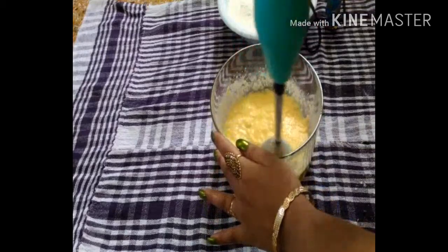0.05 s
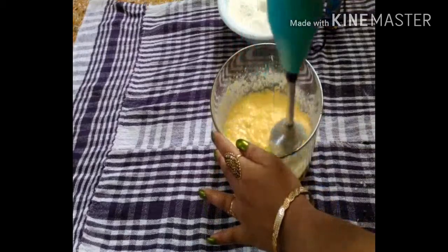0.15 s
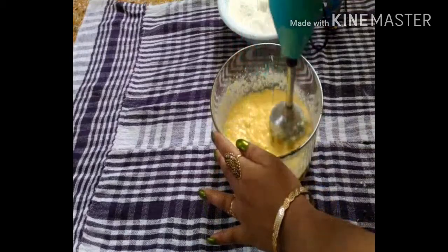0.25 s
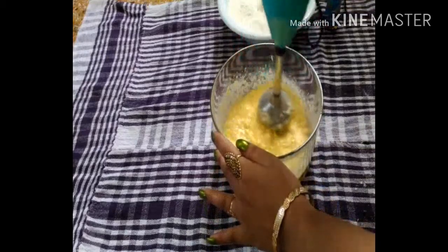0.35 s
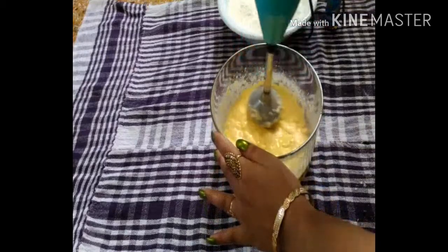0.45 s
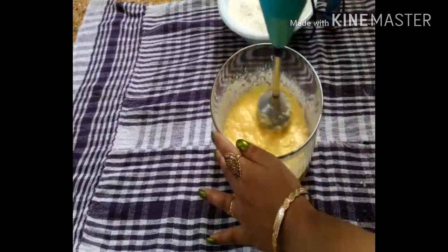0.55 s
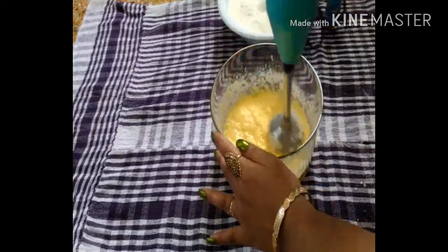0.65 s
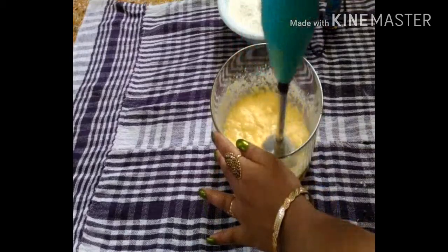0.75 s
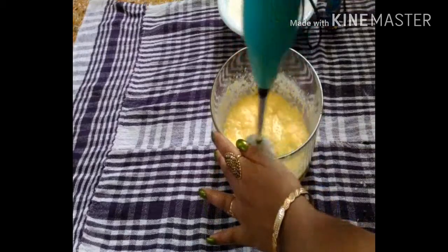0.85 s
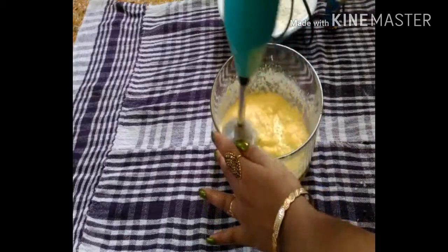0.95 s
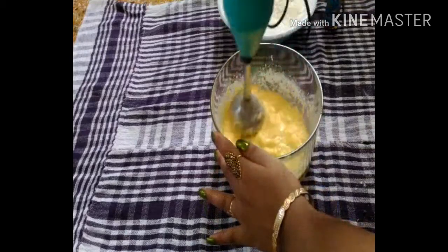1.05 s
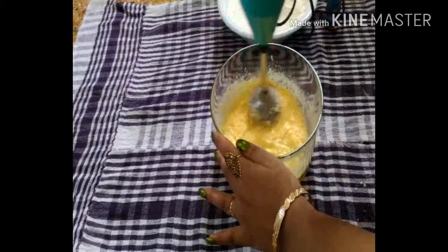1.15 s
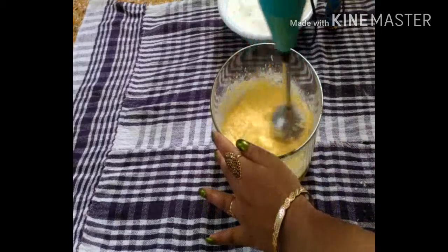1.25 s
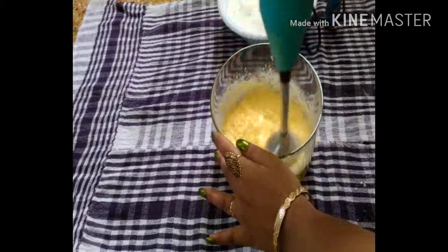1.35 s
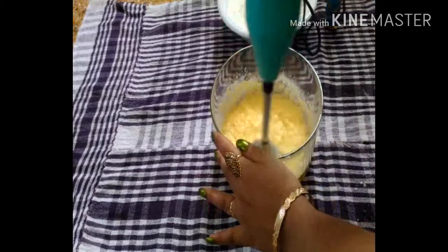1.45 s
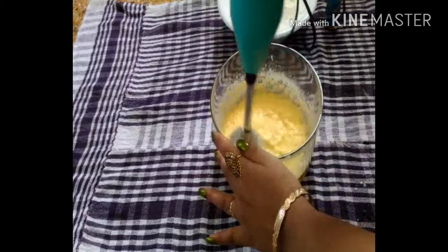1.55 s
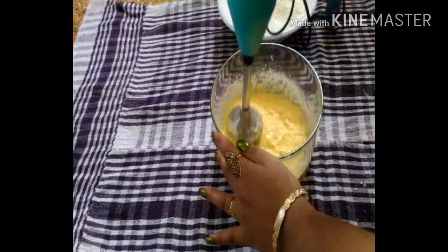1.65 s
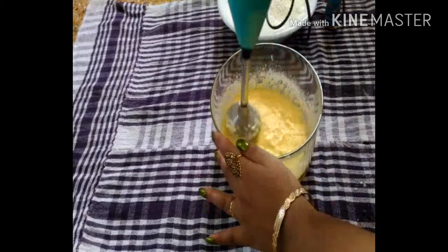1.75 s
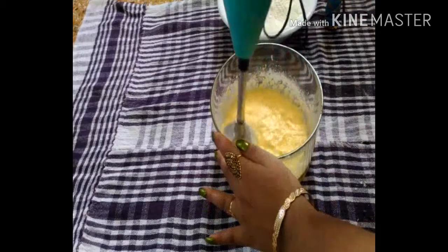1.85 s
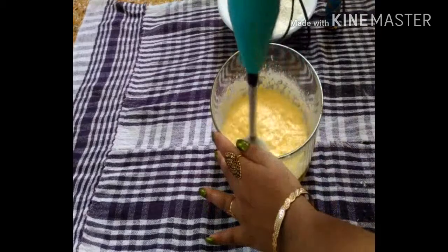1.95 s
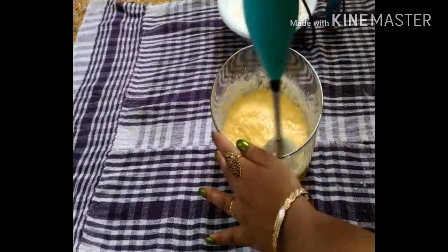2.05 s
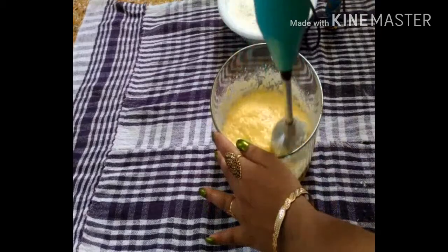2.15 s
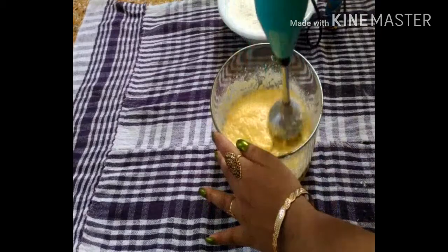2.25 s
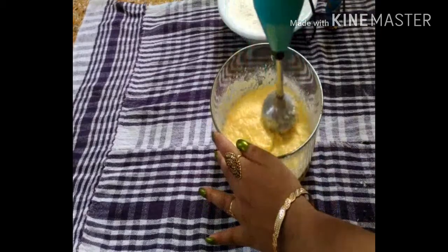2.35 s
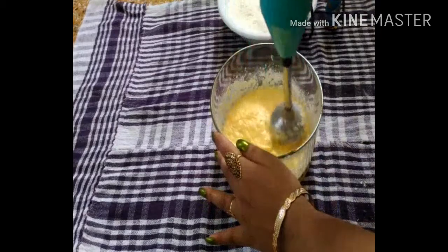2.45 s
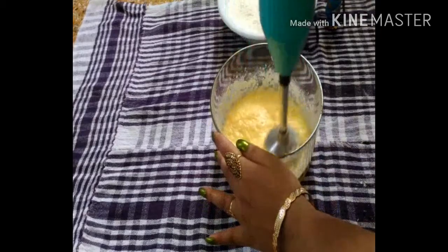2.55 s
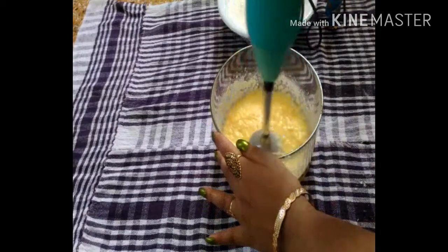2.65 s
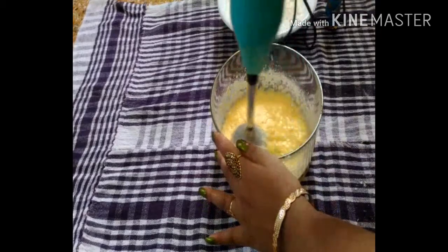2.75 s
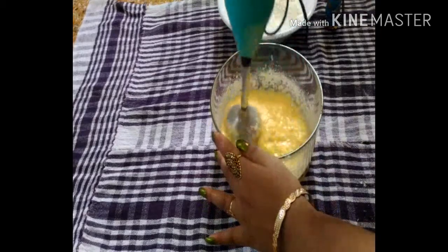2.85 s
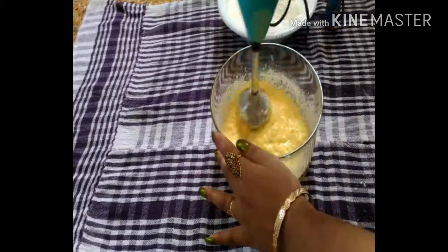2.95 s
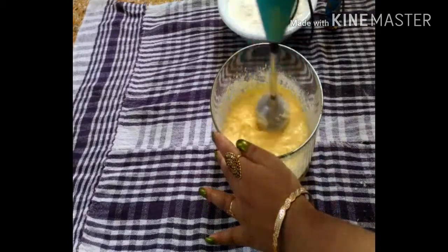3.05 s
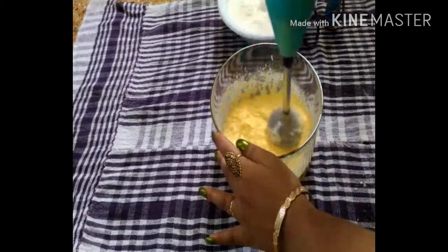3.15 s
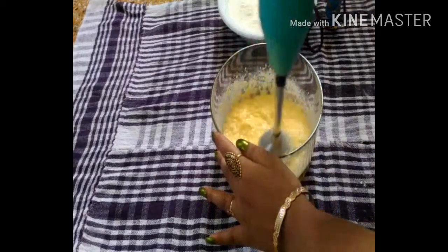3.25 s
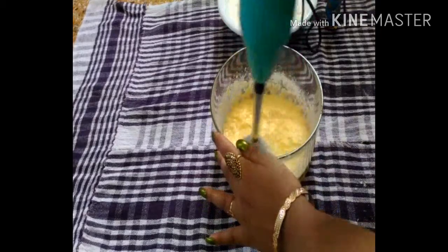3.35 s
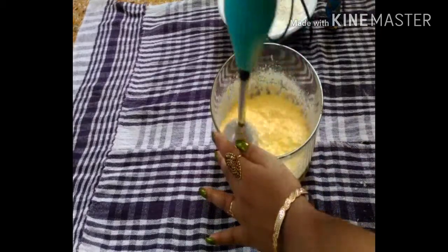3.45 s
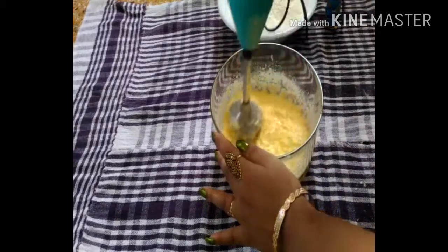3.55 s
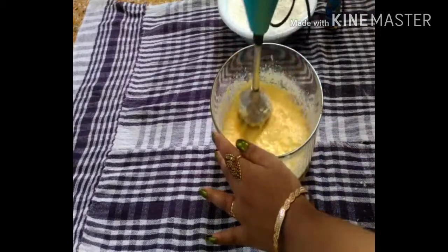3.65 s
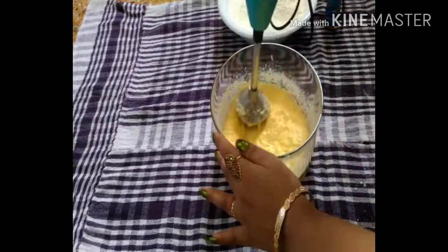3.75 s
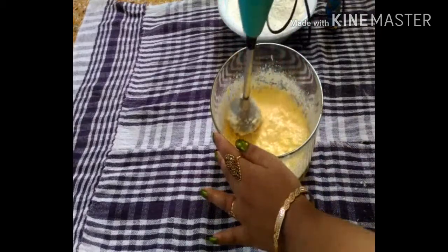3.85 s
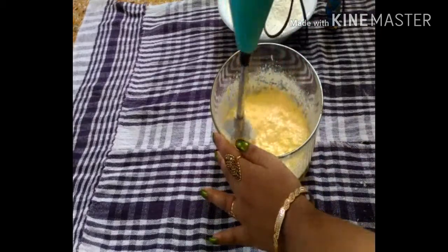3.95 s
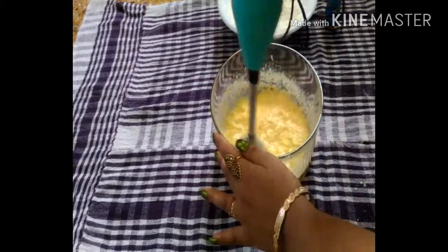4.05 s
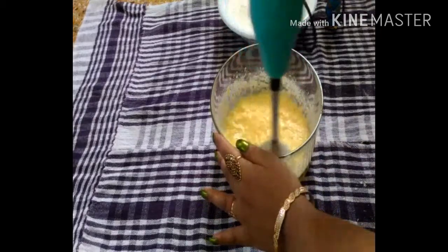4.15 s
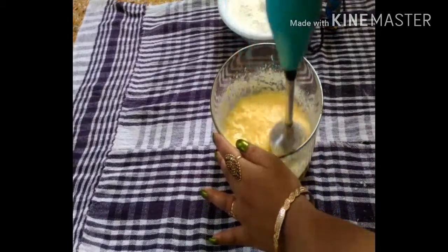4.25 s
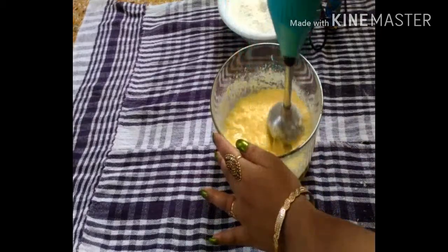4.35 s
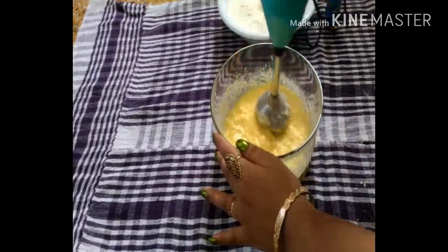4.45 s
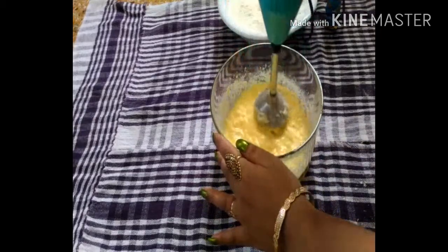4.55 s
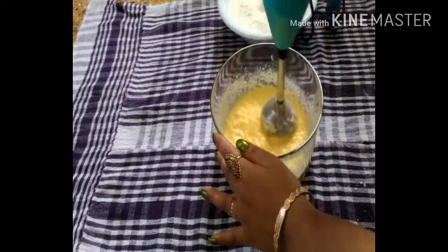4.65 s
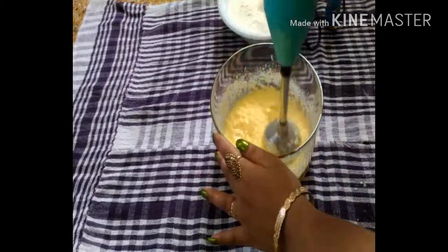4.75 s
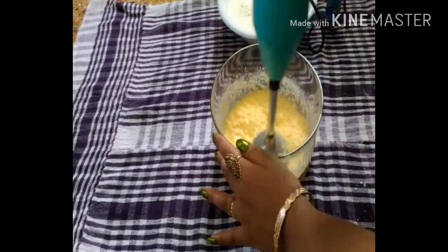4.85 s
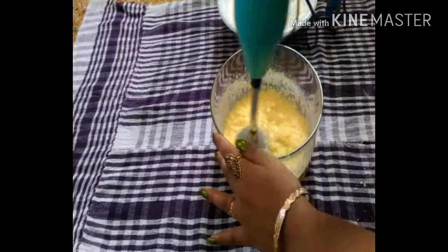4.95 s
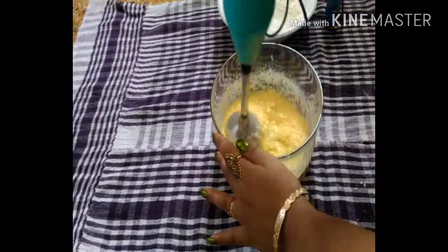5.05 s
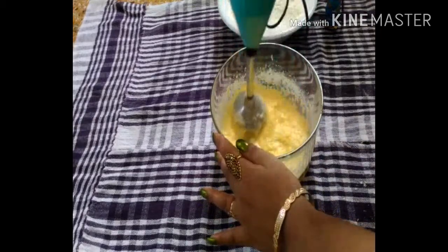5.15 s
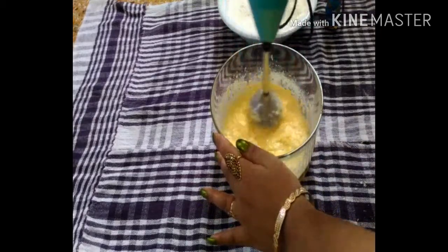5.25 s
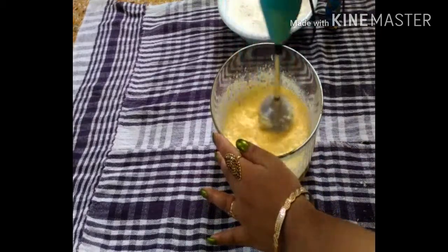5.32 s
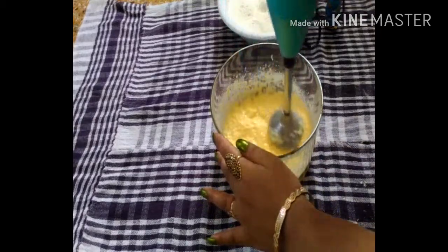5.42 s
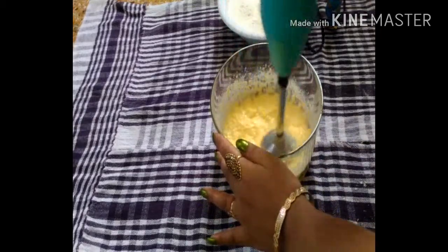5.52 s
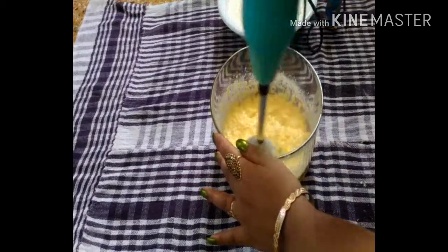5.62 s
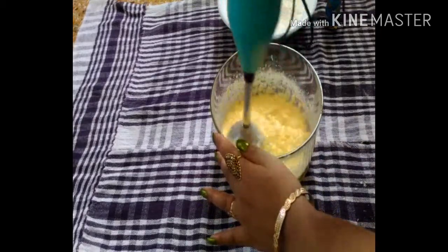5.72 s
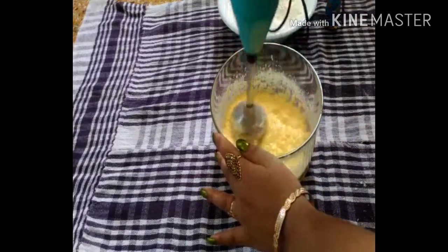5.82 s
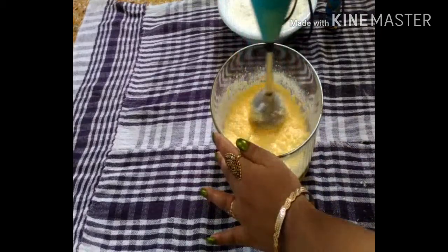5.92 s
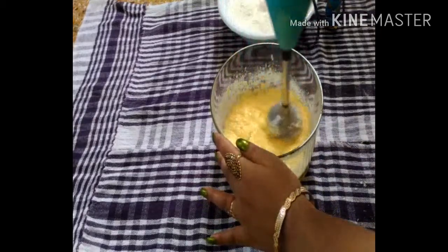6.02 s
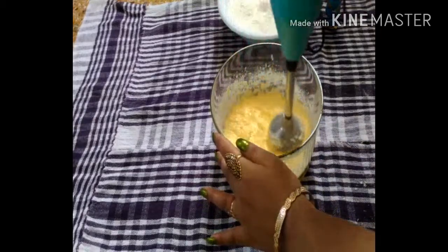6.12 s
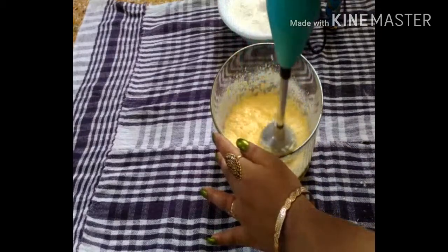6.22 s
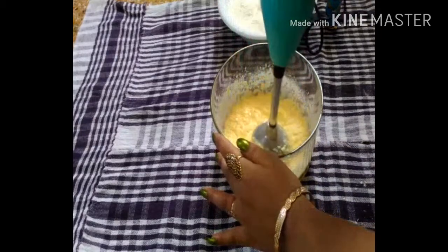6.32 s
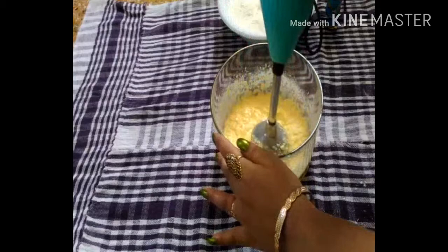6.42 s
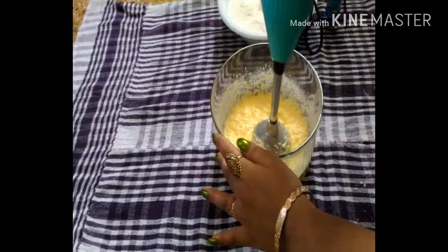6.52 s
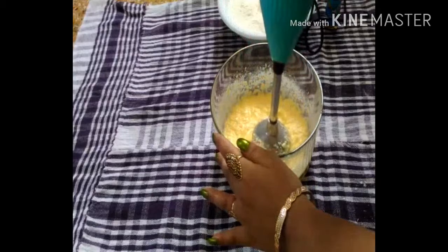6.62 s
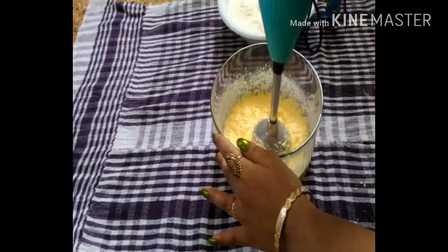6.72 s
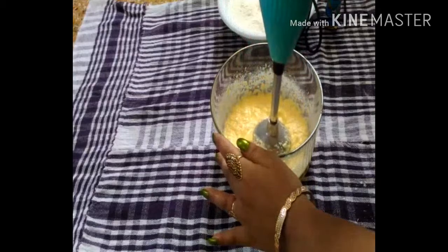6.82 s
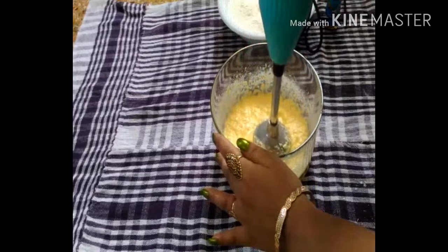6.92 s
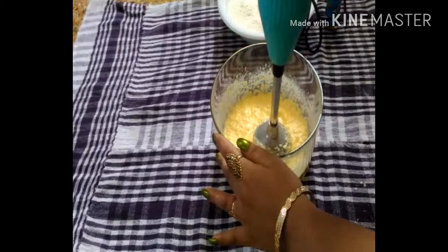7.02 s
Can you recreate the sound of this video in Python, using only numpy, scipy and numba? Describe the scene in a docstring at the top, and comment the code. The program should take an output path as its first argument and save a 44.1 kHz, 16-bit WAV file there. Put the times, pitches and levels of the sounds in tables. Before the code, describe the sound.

A phone held just over a glass picks up a blender already running in a thick egg mixture. Its whirr wavers with load, buried in sloshing, bubbling and sharp wet spatter, while the metal bell bumps and occasionally clinks on glass. The spatter is heaviest before the hand rests, then thins to a steady buzzing whine, ended by a plastic snap and quick coast-down in a close kitchen.

```python
"""A hand blender is stirred round a glass of eggs and butter in a kitchen, a phone held above it.
From the start the motor whines on multiples of its shaft speed, over the noise of fan and bearings; the blade
churns, gulps and sloshes the mix (filtered noise and bubble grains) and flings spray and blobs at the wall
(bright noise). The metal bell knocks and clinks on the glass (damped tones); other tones swell and pass.
At 6 s the hand stops stirring; at 6.83 s the switch clicks off and the blade coasts."""
import sys
import numpy as np
from scipy import signal
from scipy.io import wavfile
from scipy.ndimage import uniform_filter1d
from numba import njit

SR = 44100
rng = np.random.default_rng(int(sys.argv[2]) if len(sys.argv) > 2 else 0)


def file_out(sig):
    """Save sig as 16-bit WAV at sys.argv[1]."""
    # one column per channel
    cols = np.atleast_2d(sig).T
    # limit, then scale
    lim = np.clip(cols, -1, 1)
    pcm = np.round(lim * 32767).astype(np.int16)
    wavfile.write(sys.argv[1], SR, pcm)


N = 312222  # length [samples]


def undb(db):
    """Decibels to gain."""
    return 10 ** (np.asarray(db) / 20)


def unit(x):
    """Scaled to rms 1."""
    return x / np.sqrt(np.mean(x ** 2))


def peak(x, db):
    """Scaled to a peak level."""
    return x * undb(db) / np.max(np.abs(x))


def curves(table):
    """Columns of a table after the time, interpolated to one value a sample."""
    s, *columns = np.transpose(table)
    return [np.interp(np.arange(N) / SR, s, c) for c in columns]


def add(out, s, sound):
    """Mix a short sound in at s seconds."""
    i = int(s * SR)
    out[i:i + len(sound)] += sound[:N - i]


def walk(rate):
    """Random levels held 1 / rate s and slewed twice; spread near 1."""
    k = int(SR / rate)
    steps = np.repeat(rng.standard_normal(N // k + 1), k)
    return 1.1 * uniform_filter1d(uniform_filter1d(steps, k), k)[:N]


@njit
def svf(x, hz, width):
    """State-variable band-pass with a moving centre, gain 1 there."""
    y, b, l = np.empty(len(x)), 0., 0.
    for i in range(len(x)):
        g, k = np.tan(np.pi * hz[i] / SR), width / hz[i]
        v = (b + g * (x[i] - l)) / (1 + g * (g + k))
        b, l, y[i] = 2 * v - b, l + 2 * g * v, k * v
    return y


def band(x, hz, width):
    """Steep resonance: the band-pass twice."""
    hz = np.clip(hz, 20, .45 * SR) + np.zeros(len(x))
    return svf(svf(x, hz, 1. * width), hz, 1. * width)


def drops(per_s, scatter_db, ms):
    """A level that swells and falls at each droplet; sizes are scattered with a capped tail."""
    hit = rng.random(N) < per_s / SR
    size = undb(scatter_db * np.minimum(rng.exponential(size=N), 4))
    pole = [1, -np.exp(-1000 / (ms * SR))]
    # smoothed backwards for the swell, then forwards for the fall
    swell = signal.lfilter([1], pole, (hit * size)[::-1])[::-1]
    return unit(signal.lfilter([1], pole, swell))


@njit
def grains(at, hz, cycles, size, glide, count):
    """Each grain is a tone that swells, dies within a few cycles and can slide in pitch, like a bubble."""
    out = np.zeros(count)
    for k in range(len(at)):
        span, phase = cycles[k] * SR / hz[k], 0.
        for i in range(min(int(3 * span), count - at[k])):
            u = i / span
            phase += 2 * np.pi * hz[k] * (1 + glide * u) / SR
            out[at[k] + i] += size[k] * u * np.exp(-3 * u) * np.sin(phase)
    return out


def bubbles(per_s, hz, spread, cycles, scatter_db, glide):
    """Grains at random moments, pitches within spread octaves of hz, sizes with a capped long tail."""
    draw = rng.random((int(N / SR * 2000), 4))
    draw = draw[draw[:, 3] < per_s / 2000]  # thinned from 2000 a second
    at = (draw[:, 0] * N).astype(np.int64)
    pitch = (hz + np.zeros(N))[at] * 2 ** (spread * (2 * draw[:, 1] - 1))
    size = undb(scatter_db * np.minimum(-np.log(1 - draw[:, 2]), 3.5))
    cycles_each = cycles * (.5 + draw[:, 2])  # larger grains last more cycles
    return unit(grains(at, np.minimum(pitch, .4 * SR), cycles_each, size, 1. * glide, N))


KITCHEN_T60_S, KITCHEN_DB = .13, -22  # decay of the room's tail, its start against the direct sound


def kitchen_tail(ms):
    """Envelope of the faint tail from the kitchen walls."""
    return undb(KITCHEN_DB) * 1000 ** (-ms / 1000 / KITCHEN_T60_S)


def burst(rise_ms, fall_ms):
    """A puff of noise: quick rise, slower fall and the tail from the walls."""
    ms = np.arange(4096) / SR * 1000
    shape = np.exp(-ms / fall_ms) + kitchen_tail(ms)
    return (1 - np.exp(-ms / rise_ms)) ** 2 * shape * rng.standard_normal(len(ms))


def ring(hz, t60):
    """A damped tone with a soft start, its pitch sagging a little."""
    t = np.arange(4096) / SR
    return (1 - np.exp(-t / 0.00067)) * 1000 ** (-t / t60) * np.sin(2 * np.pi * hz * t * (1 - 1.05 * t))


OFF_S, COAST_S = 6.83, .5  # switch released; time in which the speed falls to 37%


def speed_share():
    """1 while powered, then the rotor coasts down."""
    return np.exp(-np.maximum(np.arange(N) / SR - OFF_S, 0) / COAST_S)


STILL_S, STILL_WAVER = 6.0, .3  # the hand stops stirring; share of the wavering that remains


def stirring():
    """1 while the hand stirs, less once it holds the blender still."""
    return np.interp(np.arange(N) / SR, [STILL_S - .1, STILL_S + .1], [1, STILL_WAVER])


def load():
    """How hard the blade works the mix: churn level about its mean, plus the surges, in dB."""
    db = curves(CHURN)[0]
    return db - np.mean(db) + surges()[1]


# shaft speed under power, slower where the mix is thick: (time [s], speed [Hz])
SHAFT = [(0.0, 185.4), (0.7, 186.5), (1.4, 183.2), (1.75, 187.2), (2.4, 188.6), (3.05, 186.5), (3.5, 189.8),
         (4.0, 189.9), (4.5, 191.7), (5.4, 184.6), (5.8, 188.0), (6.3, 188.8), (6.82, 186.5)]
# whine lines, 16 is the commutator: (multiple of shaft speed, relative level [dB])
ORDERS = [(2, -21), (3, -11), (4, -4), (5, -7), (6, -6), (7, -7), (8, -3), (9, -8), (12, -14), (16, -4)]
WHINE_DB = -45  # gain on the lines at mean load
WHINE_SPEED_POWER = 9.  # the whine dies quickly as the unpowered rotor slows
RIPPLE_HZ, RIPPLE = 103.1, 0.99  # the mains supply throbs the brushes twice a cycle; depth
BURIED_DB = -26  # muffling of the lines for each unit of stirring above the still hand
SHAFT_WAVER = .010  # share by which stirring makes the shaft speed waver


def motor(load_db):
    """Shaft orders waver separately, clear when the hand rests, and ring the pocket under the bell."""
    share, stir = speed_share(), stirring()
    shaft_hz = curves(SHAFT)[0] * share * (1 + SHAFT_WAVER * stir * walk(30))
    turn = 2 * np.pi * np.cumsum(shaft_hz) / SR
    powered = share == 1
    throb = 1 + RIPPLE * powered * np.cos(2 * np.pi * RIPPLE_HZ * np.arange(N) / SR)
    muffle = undb(BURIED_DB * (stir - STILL_WAVER))
    out = 0
    for order, db in ORDERS:
        level = undb(db + 4 * stir * walk(20)) * muffle
        line = level * np.sin(order * turn + 2 * stir * walk(40) + 2 * np.pi * rng.random())
        out = out + line * (throb if order > 6 else 1)
    pocket_hz = curves(CHURN)[1]
    out = out + undb(6 * stir) * band(out, pocket_hz, 300)
    return out * undb(WHINE_DB + 0.3 * load_db + 3.1 * stir * walk(5.7)) * share ** WHINE_SPEED_POWER


# the mix under the blade: (time [s], churn level [dB], air pocket under the bell [Hz],
# glass cavity against churn [dB], sizzle against churn [dB]); surges and flicker come on top
CHURN = [(0.0, -35.5, 1500, -3, -2.5), (0.35, -40.5, 1410, -8.5, -1), (0.6, -43, 1740, -2.5, -2.5),
         (0.9, -38.5, 1690, -0.5, -4), (1.35, -50.5, 1410, 4, 2), (1.6, -43, 1220, -10, 1.5),
         (1.85, -37, 1770, -2, -4.5), (2.15, -41.5, 1690, -12, 1.5), (2.45, -39.5, 1650, -7, -1),
         (2.75, -36, 1410, 0, -3), (3.05, -44, 1470, -6, -2), (3.35, -45.5, 1306, 2, -2),
         (3.6, -39, 1810, -8.5, 2.5), (3.98, -44, 1870, -5.5, -2.5), (4.15, -45.5, 1670, -4.5, 0.5),
         (4.3, -38.5, 1620, -5, -8), (4.48, -44.5, 1450, -12, -0.5), (4.6, -44, 1478, -7, 0.5),
         (4.75, -41, 1380, -4.5, 1.5), (5.07, -32.5, 1390, -4.5, -5.5), (5.3, -36.5, 1310, -6.5, -2),
         (5.53, -57.5, 1370, 0.5, -1), (5.8, -34.5, 1290, 1.5, -2), (6.05, -41.5, 1494, -12, -2.5),
         (6.85, -45.5, 1510, -6.5, 0.5), (7.08, -52.5, 1380, -4, -3.5)]
TICKS_PER_S, TICKS_DB = 120., -12  # small lumps ticking on the glass; dB against churn


def churn():
    """Bubbles and lumpy flow ring the pocket under the bell and the air in the glass."""
    db, pocket_hz, cavity_db, sizzle_db = curves(CHURN)
    db = db + surges()[1]
    pocket_hz = pocket_hz * (1 + .05 * stirring() * walk(12))
    lumps = drops(per_s=200., scatter_db=3., ms=2.5) * rng.standard_normal(N)
    pocket = unit(band(lumps, pocket_hz, 400))
    pocket = pocket + undb(3.5) * bubbles(250., 1380.0, 0.53, 33.0, scatter_db=2.0, glide=0.024)
    cavity = unit(band(lumps, 835, 147))
    cavity = cavity + undb(1.0) * bubbles(70., 860., 0.1297, 25.0, scatter_db=3.5, glide=0.028)
    sizzle = unit(band(lumps, 2550, 5800))
    sizzle = sizzle + undb(-4.5) * bubbles(400., 2840, 0.349, 39.0, scatter_db=2.0, glide=0)
    sizzle = sizzle + undb(-14) * unit(band(lumps, 2990, 114))
    ticks = drops(per_s=TICKS_PER_S, scatter_db=2.5, ms=.6) * rng.standard_normal(N)
    ticks = undb(db + TICKS_DB) * unit(svf(ticks, np.full(N, 3200.), 6700.0))
    pocket = undb(db + 1.6 * walk(17)) * unit(pocket)
    cavity = undb(db + cavity_db + 2.0 * walk(12.0)) * unit(cavity)
    sizzle = undb(db + sizzle_db + 1.6 * walk(9)) * unit(sizzle)
    return ticks + pocket + cavity + sizzle


# the blade breaks the surface and throws a sheet of mix:
# (middle [s], half length [s], spray lift [dB], churn lift [dB])
SURGES = [(0.428, 0.032, 12, 3.5), (0.802, 0.061, 2, 2.5), (0.987, 0.087, 10.5, 0), (1.404, 0.17, 3, 3.5),
          (2.02, 0.28, 4, 0), (2.26, 0.11, 6.5, 4), (2.6, 0.19, 6, -2), (2.853, 0.073, 9.5, 8),
          (2.925, 0.017, 9, 1), (2.98, 0.039, 7, -0.5), (3.373, 0.11, 7, 3.5), (3.548, 0.086, 1, -4),
          (4.047, 0.22, 4.5, 8.5), (4.236, 0.068, 6, 8), (4.334, 0.065, 9, 5.5), (4.524, 0.18, 7.5, 7),
          (4.664, 0.047, -3, 7), (4.9, 0.2, 4.5, -1), (5.117, 0.13, 13.5, 1), (5.266, 0.13, 8.5, -1.5),
          (5.447, 0.25, -2, 4.5), (5.607, 0.35, 1, 10.5), (5.798, 0.16, 3.5, -3), (5.98, 0.11, 3, -1.5),
          (6.756, 0.026, 10.5, 3)]


def surges():
    """Lift of spray and of churn in dB: each surge swells and sinks smoothly."""
    t, lift = np.arange(N) / SR, np.zeros((2, N))
    for s, half_s, *db in SURGES:
        i = slice(int((s - half_s) * SR), int((s + half_s) * SR))
        lift[:, i] += np.outer(db, np.cos(np.pi / 2 * (t[i] - s) / half_s) ** 2)
    return lift


# steady spray before surges and gusts: (time [s], bright level [dB], lower hiss level [dB])
SPRAY = [(0.0, -26.5, -39), (0.43, -34.5, -45.5), (0.91, -32, -45.5), (1.12, -33.5, -48),
         (1.52, -37.5, -47), (2.54, -34.5, -44), (2.78, -28.5, -42), (3.1, -36, -49), (3.57, -37.5, -46),
         (3.92, -36.5, -50.5), (4.22, -32, -41.5), (4.53, -34, -48.5), (4.87, -32.5, -40.5),
         (5.09, -34, -42.5), (5.4, -32, -43.5), (5.84, -30, -42.5), (6.07, -35, -47), (6.76, -41.5, -49),
         (6.94, -51, -56), (7.08, -53, -56)]
# bright bands of the spray: (centre [Hz], width [Hz], relative level [dB])
SPRAY_MODES = [(9200, 600, 3), (10500, 2200, 3.5), (13200, 3000, -9.5), (7150, 2040, -9.5)]
SPRAY_DRIFT = .025  # share by which the bands wander


def spray():
    """Dense droplets in gusts, bright where the microphone port resonates; mid and side."""
    (db, lower_db), (spray_lift_db, churn_lift_db) = curves(SPRAY), surges()
    gust_db, swell_db = 0.23 * walk(45), 1.4 * walk(19)
    gusts = undb(db + spray_lift_db + gust_db + swell_db)
    lower_db = lower_db + 0.6 * spray_lift_db + 0.27 * churn_lift_db
    lower_db = lower_db + gust_db + .8 * swell_db + 2.5 * walk(25)
    # mid and side share the droplets' timing, with unrelated noise in each
    gates = [0.9 + drops(per_s=450., scatter_db=1.5, ms=1.) for _ in SPRAY_MODES]
    lower_gate = drops(per_s=400., scatter_db=4.5, ms=4.)
    out = []
    for lower_cut_db in (0, -46):  # hardly any lower hiss in the side
        noise = rng.standard_normal(N)
        bright = 0
        for gate, (hz, width, mode_db) in zip(gates, SPRAY_MODES):
            mode = band(gate * noise, hz * (1 + SPRAY_DRIFT * walk(9)), width)
            bright = bright + undb(mode_db + 4.5 * walk(30)) * mode
        pings = undb(-4.5) * bubbles(550.0, 9740, 0.21, 8.4, scatter_db=1., glide=0)
        lower = unit(band(lower_gate * rng.standard_normal(N), 4900 * (1 + SPRAY_DRIFT * walk(9)), 1080))
        out.append(gusts * unit(unit(bright) + pings) + undb(lower_db + lower_cut_db) * lower)
    return out


# blobs slapping the wall: (middle [s], bright peak [dB], centre [Hz], lower body against peak [dB])
SPLATS = [(0.0223, -20, 11000, -16), (0.0293, -17, 11300, -25), (0.0953, -17, 10600, -19),
          (0.1693, -16, 10200, -17), (0.24, -18, 10300, -23), (0.3385, -17, 9800, -21),
          (0.3493, -28, 10300, -18), (0.379, -18, 9700, -19), (0.3866, -17, 9500, -21),
          (0.41, -11, 10600, -29), (0.4208, -15, 10300, -29), (0.429, -13, 10300, -17),
          (0.4323, -9, 9500, -30), (0.6382, -19.5, 10100, -22), (0.7012, -18, 9700, -16),
          (0.725, -17, 10400, -13), (0.7448, -16, 10400, -23), (0.7488, -14, 10200, -22),
          (0.79, -18, 10100, -15), (0.8, -19, 10400, -13), (0.8403, -13.5, 9400, -11),
          (0.8715, -21, 9500, -14), (0.89, -16.5, 9600, -20), (0.929, -13, 9800, -20),
          (0.9503, -9, 10000, -27), (0.9774, -15, 10900, -25), (0.983, -10, 10200, -21),
          (0.9897, -6, 10300, -20), (1.0159, -15.5, 10500, -10.5), (1.057, -15.5, 9200, -20),
          (1.0933, -16, 8500, -20), (1.2244, -20, 10200, -26), (1.2602, -16, 9100, -27),
          (1.3203, -19, 10100, -11), (1.3528, -17.5, 10300, -26), (1.3578, -17, 10400, -17),
          (1.389, -14, 10100, -15), (1.4615, -11, 9900, -21), (1.4706, -25, 9900, -21),
          (1.4769, -18, 9900, -20), (1.6393, -20, 10800, -4), (1.6952, -19, 10300, -22),
          (1.7692, -17, 9900, -20), (1.851, -16, 10400, -10), (1.8602, -19, 10100, -20),
          (1.8706, -7, 10500, -30), (1.9, -10, 10200, -21), (1.978, -10, 10550, -26),
          (2.0003, -10, 10600, -20), (2.0068, -19, 10800, -12), (2.0397, -17, 10100, -19),
          (2.1141, -19, 10700, -22), (2.2335, -16, 10000, -19), (2.2488, -22, 9800, -20),
          (2.2597, -21, 10200, -20), (2.3371, -13, 9900, -27), (2.343, -19, 10500, -24),
          (2.3854, -17.5, 10800, -24), (2.424, -16, 10200, -17), (2.4896, -17, 10100, -19),
          (2.5272, -8.5, 10600, -22), (2.561, -17, 11300, -21), (2.5689, -15, 10100, -20),
          (2.5936, -19, 9500, -20), (2.6043, -12, 9600, -24), (2.6285, -23, 11400, -14),
          (2.644, -18, 9500, -19), (2.7489, -15, 10000, -14), (2.7794, -12, 10200, -23),
          (2.7951, -11, 11100, -28), (2.8244, -12, 9600, -22), (2.8296, -11, 10000, -15),
          (2.8406, -10, 10400, -24), (2.8493, -10, 9100, -13), (2.8591, -8, 10000, -27),
          (2.8673, -8, 11200, -21), (2.88, -8, 9300, -18), (2.8846, -10, 9800, -10.5),
          (2.891, -15, 9200, -18), (2.927, -12, 10200, -23), (2.9304, -11, 9300, -14),
          (2.9567, -12, 9200, -18), (2.9636, -17, 9200, -26), (2.969, -17, 10200, -25),
          (2.9831, -15, 9300, -24), (2.9887, -7.5, 10780, -25), (2.993, -16, 9250, -22),
          (2.999, -14, 9500, -21), (3.013, -20, 10500, -29), (3.1443, -16.5, 8800, -20),
          (3.152, -19, 11300, -13), (3.224, -19.5, 10400, -25), (3.3248, -22, 10000, -29),
          (3.3338, -22, 10000, -23), (3.3513, -14, 9600, -16), (3.4446, -13, 9300, -29),
          (3.4476, -16, 9300, -19), (3.5337, -16.5, 10400, -23), (3.5583, -16, 11200, -9),
          (3.563, -15.5, 9900, -17), (3.569, -17, 10300, -21), (3.6761, -21, 10300, -13),
          (3.6854, -14, 10200, -22), (3.9351, -16, 10600, -12), (4.0152, -18, 10100, -20),
          (4.0514, -18, 11000, -25), (4.0707, -8.5, 10200, -27), (4.1072, -11.5, 10000, -9.5),
          (4.1176, -17, 9700, -19), (4.1467, -18, 9900, -18), (4.2259, -21, 10200, -15),
          (4.2337, -13, 9800, -17), (4.239, -3.5, 9900, -27), (4.2472, -11, 10700, -24),
          (4.2658, -13, 10500, -21), (4.3168, -15, 9500, -20), (4.3413, -16, 9700, -17),
          (4.3559, -21, 10100, -20), (4.3861, -14, 9300, -23), (4.4043, -17, 9200, -23),
          (4.478, -10, 9500, -14), (4.4857, -13, 10100, -14), (4.4898, -6.5, 9600, -24),
          (4.513, -10, 9300, -28), (4.5196, -10.5, 9300, -12), (4.5448, -14, 10400, -12),
          (4.5803, -14, 9500, -15), (4.6517, -6, 9600, -28), (4.6867, -11, 9500, -21),
          (4.7263, -17, 9800, -17), (4.8255, -9, 9300, -12.5), (4.829, -12, 10000, -10),
          (4.8374, -18, 10100, -17), (4.8612, -10, 9900, -20), (4.891, -8.5, 9400, -17),
          (4.8984, -11, 9800, -22), (4.9408, -11, 9500, -16), (4.9553, -18, 9800, -15),
          (5.0473, -17, 10200, -12), (5.0546, -9.5, 9100, -21), (5.1, -19, 9700, -17),
          (5.109, -19, 10300, -23), (5.1163, -11, 10500, -3.5), (5.13, -9.5, 10300, -17),
          (5.1434, -10, 9600, -21), (5.15, -10, 9800, -13), (5.157, -11.5, 10100, -10),
          (5.1602, -8, 9500, -13), (5.1812, -7, 10100, -27), (5.186, -8, 10700, -21),
          (5.197, -11, 10500, -22), (5.2157, -5, 10900, -30), (5.2417, -12, 11200, -19),
          (5.252, -15, 11200, -26), (5.2566, -11.5, 11200, -16), (5.2607, -11, 9200, -18),
          (5.3131, -15.5, 9600, -17), (5.3235, -20, 9200, -20), (5.3564, -20, 10000, -19),
          (5.4123, -9.5, 9000, -14), (5.49, -16, 10200, -26), (5.504, -12.5, 10100, -25),
          (5.5385, -12.5, 9500, -20), (5.585, -17, 10000, -1), (5.616, -16, 9500, -17),
          (5.621, -12.5, 9300, -24), (5.6638, -16, 10100, -12), (5.6831, -14, 9600, -15),
          (5.6947, -18, 9600, -22), (5.7004, -10.5, 10000, -24), (5.7593, -13, 10800, -3),
          (5.763, -8.5, 10300, -8.5), (5.767, -6.5, 10000, -10), (5.774, -10, 10700, -15),
          (5.7913, -17, 11000, -20), (5.798, -7.5, 9040, -14), (5.8036, -10, 10300, -20),
          (5.8131, -11, 11000, -18), (5.8236, -18, 10500, -26), (5.8308, -15, 10800, -21),
          (5.8346, -11, 10500, -21), (5.8386, -18, 10900, -20), (5.8537, -11, 10500, -27),
          (5.8926, -12, 8700, -19), (5.945, -7, 10900, -31), (5.9498, -13, 10900, -10),
          (5.9537, -15, 10500, -12), (5.971, -18, 11200, -23), (5.9803, -16, 10480, -22),
          (5.99, -18, 10500, -23), (6.009, -22, 10000, -25), (6.0516, -20, 10500, -30),
          (6.1181, -14, 10400, -10), (6.4108, -16, 9700, -11), (6.4821, -22, 9400, -20),
          (6.5482, -24, 8800, -7), (6.554, -23, 10200, -21), (6.7491, -22, 10400, -13)]
SPLAT_MS, SPLAT_WIDTH_HZ = 1.15, 1900  # time in which a blob swells and sinks; width of its bright band


def splats():
    """Each blob is a few milliseconds of bright noise over a duller body, with a faint wall tail; mid, side."""
    out, ms = np.zeros((2, N)), np.arange(-128, 3968) / SR * 1000
    shape = np.exp(-(ms / SPLAT_MS) ** 2 / 2) + (ms > 0) * kitchen_tail(ms)
    for s, db, hz, body_db in SPLATS:
        for channel in out:
            puff = shape * rng.standard_normal(len(ms))
            blob = peak(band(puff, hz, SPLAT_WIDTH_HZ), db) + peak(band(puff, 4900, 1180), db + body_db)
            add(channel, s + ms[0] / 1000, blob)
    return out


# bell bumping the glass through the mix: (time [s], peak [dB], thud [Hz])
KNOCKS = [(0.13, -35, 1440), (0.561, -23, 1560), (0.842, -24.5, 770), (0.95, -23, 1660), (1.194, -31, 1710),
          (1.319, -28, 910), (1.474, -16.5, 1164), (1.638, -29, 1090), (1.851, -18, 1540),
          (2.006, -25, 1620), (2.228, -28, 1340), (2.259, -26, 860), (2.81, -21, 1300), (3.096, -23.5, 870),
          (3.222, -25, 890), (4.433, -21, 1330), (4.513, -25, 1360), (4.541, -22, 1500), (5.031, -22, 870),
          (5.114, -19, 1225), (5.237, -22.5, 1340), (5.376, -25, 1220), (5.58, -22.5, 925),
          (5.656, -20, 1030), (5.682, -20, 875), (5.694, -19, 910), (5.729, -17, 833), (5.76, -13.5, 1270),
          (5.797, -21, 856), (5.851, -25, 860), (6.03, -28, 1420), (6.099, -25, 1370), (6.219, -28, 1580),
          (6.27, -46, 1500)]
KNOCK_T60_S = 0.059


def knocks():
    """Two damped tones and a puff of noise for each bump."""
    out = np.zeros(N)
    for s, db, hz in KNOCKS:
        puff = peak(band(burst(rise_ms=.3, fall_ms=4.), 1200, 1300), 0)
        add(out, s, peak(ring(hz, KNOCK_T60_S) + .5 * ring(850, KNOCK_T60_S) + 1.2 * puff, db))
    return out


# bare metal on glass: (time [s], chime level [dB],
# share of the free ring time left by hand and mix, clack peak [dB])
CLINKS = [(1.1957, -35, 0.12, -25), (1.6362, -34.5, 0.7, -22), (1.8492, -40, 0.29, -27),
          (3.7439, -35, 0.28, -36), (3.7903, -35, 0.51, -34), (3.902, -52, 0.2, -39)]
# ringing modes of the free glass: (pitch [Hz], relative level [dB], t60 [s])
GLASS = [(1055, -2, .5), (2099, 0, 1.2), (3321, -4, .3), (4860, -3, .2)]


def clinks():
    """The glass rings in a few damped modes behind a noisy clack."""
    out, t = np.zeros(N), np.arange(SR) / SR
    for s, db, free, clack_db in CLINKS:
        rasp = 1.3 * walk(110)[:SR]  # the bell keeps chattering on the glass: phase wobble [rad]
        colour_db = 2 * rng.standard_normal(len(GLASS))
        chime = 0
        for (hz, mode_db, t60), c in zip(GLASS, colour_db):
            level = undb(db + mode_db + c * (hz != GLASS[1][0]))  # the strongest mode keeps its level
            chime = chime + level * np.sin(2 * np.pi * hz * t + rasp) * 1000 ** (-t / (t60 * free))
        add(out, s, chime)
        add(out, s, peak(band(burst(rise_ms=.3, fall_ms=3.), 2300, 1900), clack_db))
    return out


# a scrape, the snap and its bounces: (time after release [s], peak against the snap [dB])
SWITCH = [(-0.012, -15), (0.001, 0), (0.016, -14), (0.028, -12), (0.077, -20), (0.1, -19)]
# colour of the switch: (centre [Hz], width [Hz], relative level [dB])
SWITCH_MODES = [(1500, 1300, 3), (2490, 750, 4.5), (3540, 1700, 7.5), (9500, 4900, 11.5)]
SWITCH_DB = -10  # peak of the snap


def switch():
    """Short puffs of noise ringing the bands of the switch."""
    out = np.zeros(N)
    for s, db in SWITCH:
        snap = burst(rise_ms=1.5, fall_ms=2.)
        click = sum(undb(d) * unit(band(snap, hz, width)) for hz, width, d in SWITCH_MODES)
        add(out, OFF_S + s, peak(click, SWITCH_DB + db))
    return out


# air gulped under the bell: (time [s], peak [dB], pitch [Hz])
GULPS = [(0.465, -32, 300), (0.613, -36, 330), (0.741, -28.5, 340), (0.848, -29.5, 413), (0.891, -28, 248),
         (1.034, -36, 517), (1.207, -33, 670), (2.009, -29.5, 280), (2.191, -38, 294), (2.735, -26, 536),
         (2.885, -29.5, 414), (3.096, -26.5, 571), (3.239, -30.5, 546), (3.412, -31, 536),
         (3.559, -36, 367), (3.974, -27, 241), (4.222, -31.5, 300), (4.476, -37, 277), (4.775, -41, 294),
         (4.967, -24.5, 255), (5.032, -22.5, 555), (5.288, -34, 650), (5.375, -24.5, 694),
         (5.584, -32, 270.4), (5.692, -22.5, 510), (5.858, -31, 573)]
GULP_T60_S = 0.1


def gulps():
    """Short low plops: a damped tone and a puff of noise."""
    out = np.zeros(N)
    for s, db, hz in GULPS:
        puff = peak(band(burst(rise_ms=1., fall_ms=5.1), 465, 750), 0)
        add(out, s, peak(ring(hz, GULP_T60_S) + 1.47 * puff, db))
    return out


# motor and shaft lines that stand out for a moment, and other passing tones:
# (middle [s], half length [s], pitch [Hz], level before flicker [dB])
PASSING_TONES = [(0.1, 0.29, 104.4, -48), (2.55, 0.21, 283, -48.5), (2.644, 0.31, 160, -44.5),
                 (3.927, 0.23, 2176, -42), (4.223, 0.22, 151.5, -53), (4.32, 0.16, 1530, -35.5),
                 (4.47, 0.04, 1360, -34.5), (4.877, 0.26, 120, -46), (5.096, 0.3, 838, -38.5),
                 (5.798, 0.13, 849, -32.5)]
TONE_WANDER_HZ = 6


def passing_tones():
    """Passing tones that swell and sink, wandering in pitch and flickering in level."""
    out, t = np.zeros(N), np.arange(N) / SR
    wander = TONE_WANDER_HZ * np.cumsum(walk(15)) / SR
    flicker = undb(3 * walk(25))
    for s, half_s, hz, db in PASSING_TONES:
        swell = np.cos(np.pi / 2 * np.clip((t - s) / half_s, -1, 1))
        out += undb(db) * swell * flicker * np.sin(2 * np.pi * (hz * t + wander))
    return out


# shaft humming through the glass, before flicker:
# (time [s], level [dB], level of the line at one and a half times the speed [dB])
SHAFT_HUM = [(0.0, -59, -53), (1.22, -60, -61), (1.31, -46.5, -58), (1.52, -59, -76), (1.75, -49, -55),
             (3.04, -57, -60), (3.35, -61, -66), (4.34, -48, -49), (4.57, -46, -72), (4.64, -36, -38),
             (4.72, -61, -54), (4.77, -42, -48), (4.91, -64, -40), (4.94, -47, -57), (5.44, -53, -52),
             (6.45, -59, -70), (6.58, -50, -56), (6.83, -53, -77)]


def shaft_hum():
    """The shaft line and one above it come and go as the bell touches the glass."""
    db, upper_db = curves(SHAFT_HUM)
    share = speed_share()
    turn = 2 * np.pi * np.cumsum(curves(SHAFT)[0] * share + 3.475 * walk(20)) / SR
    line = undb(db + 6.7 * walk(14)) * np.sin(turn)
    upper = undb(upper_db + 4.5 * walk(10)) * np.sin(turn * 3 / 2)
    return (line + upper) * share ** WHINE_SPEED_POWER


# the whole mass moving, before flicker: (time [s], slosh level [dB], glugs against slosh [dB])
SLOSH = [(0.0, -44, 0), (0.4, -48, -5.5), (0.95, -46.5, -6), (1.12, -55, 3), (1.3, -53, -0.5),
         (1.55, -54.5, 8), (1.75, -44, -9), (2.3, -49, -4), (2.9, -46, -5), (3.05, -54, 1),
         (3.4, -56, -1.5), (3.7, -48.5, 3.5), (4.05, -49.5, -10), (4.3, -43, -5), (4.7, -48.5, -4),
         (5.05, -45.5, -0.5), (5.75, -45, -2), (6.2, -63, 3.5), (6.55, -58.5, 2), (6.85, -61, 8),
         (7.08, -54, -5)]
HUM_HZ, HUM_WANDER_HZ = 201, 5.3
GLUG_FLICKER_DB = 2.5


def slosh():
    """The whole mass slops round with a wandering hum, glugs above it and rumble below."""
    db, glug_db = curves(SLOSH)
    hum_hz = HUM_HZ + HUM_WANDER_HZ * walk(3.8)
    slop = drops(per_s=65.0, scatter_db=-2.0, ms=8.4) * rng.standard_normal(N)
    hum = unit(band(slop, hum_hz, 122))
    hum = hum + undb(-10.5) * bubbles(25., 187.4, 0.79, 8.2, scatter_db=4.0, glide=0)
    rumble = undb(-9.0) * unit(band(slop, 129, 90))
    glugs = bubbles(200., 480.0, 0.45, 12., scatter_db=1.5, glide=0)
    glug_db = db + glug_db + GLUG_FLICKER_DB * walk(10)
    return undb(db + 0.22 * walk(4.9)) * unit(hum + rumble) + undb(glug_db) * glugs


# spectrum of fan and bearings: (frequency [Hz], relative level per Hz [dB])
WHIRR = [(24, -52), (40, -15.5), (187, -0.5), (487, -27), (551, 2), (654, -22.5), (739, 5), (1070, -39),
         (1470, 1.5), (1880, -8), (3550, -36.5), (7770, -4), (10200, 5), (14000, -19.5)]
WHIRR_DB, WHIRR_SPEED_POWER = -40, 1.8  # level at mean load; how it falls with the rotor's speed


def whirr(load_db):
    """Half-octave bands of fan and bearing noise, rattling together and flickering alone; mid and side."""
    hz_points, db_points = np.transpose(WHIRR)
    out, rattle_db = 0, 4.15 * walk(35)
    for hz in 45 * 2 ** np.arange(0, 8.6, .5):
        db = np.interp(np.log(hz), np.log(hz_points), db_points) + rattle_db + 4.4 * walk(22)
        out = out + undb(db) * band(rng.standard_normal(2 * N), hz, hz / 2).reshape(2, N)
    return unit(out) * undb(WHIRR_DB + .5 * load_db) * speed_share() ** WHIRR_SPEED_POWER


APART_HZ, APART_DB = 4300, -7  # above this the two ports hear the sound differently; gain of the side


def scene():
    """All sources; the phone's two ports agree in the lows and less in the treble."""
    load_db = load()
    (mist, mist_side), (blobs, blobs_side), (fan, fan_side) = spray(), splats(), whirr(load_db)
    mid = motor(load_db) + churn() + mist + blobs + knocks() + clinks() + switch()
    mid = mid + gulps() + passing_tones() + shaft_hum() + slosh() + fan
    high = signal.butter(4, APART_HZ, "high", fs=SR, output="sos")
    side = signal.sosfilt(high, mist_side + blobs_side + fan_side)
    # the ports differ a little more round 13 kHz
    side = undb(APART_DB) * (side + 0.2 * band(side, 13000, 4000))
    return mid + np.array([side, -side])


TOP_HZ = 14230  # upper limit of the phone


def record(dry):
    """The phone rounds the loudest peaks and cuts the top."""
    rounded = np.tanh(.6 * dry) / .6
    return signal.sosfilt(signal.ellip(12, .3, 80, TOP_HZ, fs=SR, output="sos"), rounded)


dry = scene()
out = record(dry)
file_out(out)
```